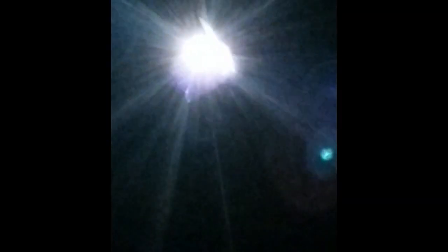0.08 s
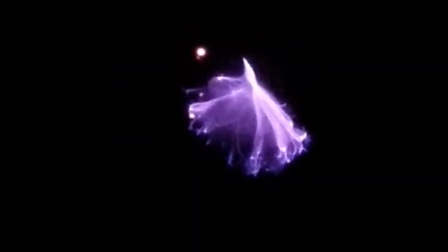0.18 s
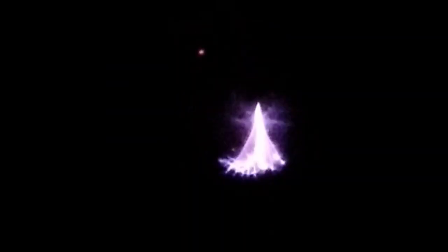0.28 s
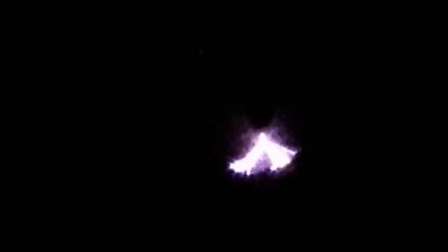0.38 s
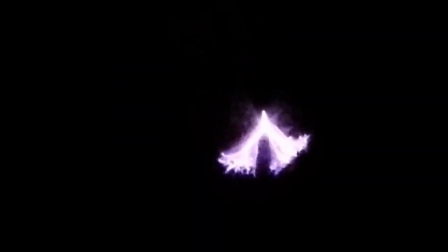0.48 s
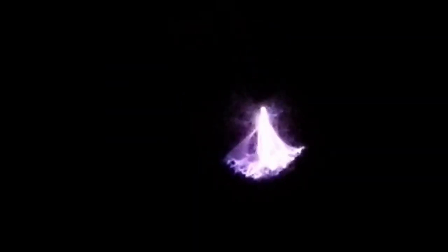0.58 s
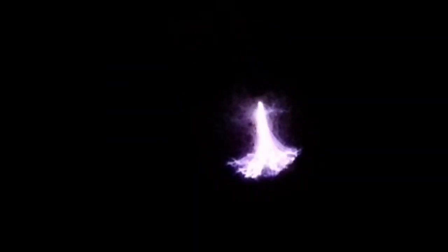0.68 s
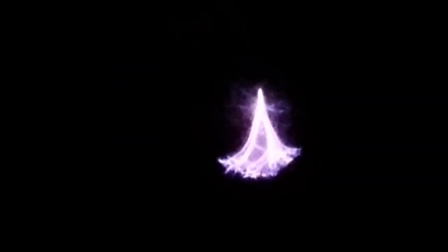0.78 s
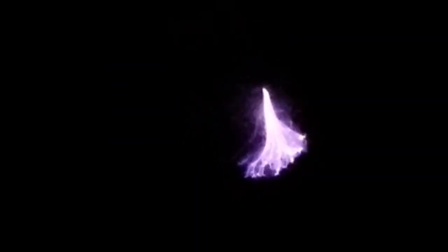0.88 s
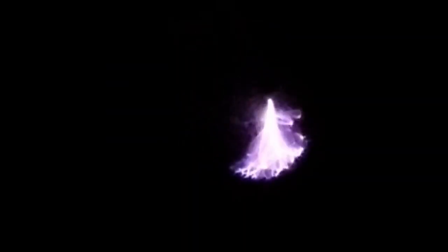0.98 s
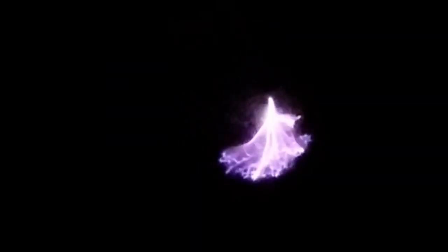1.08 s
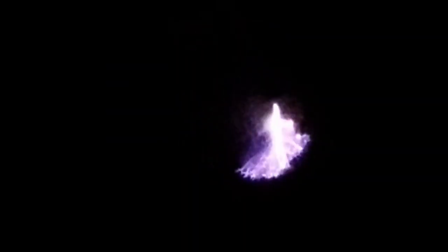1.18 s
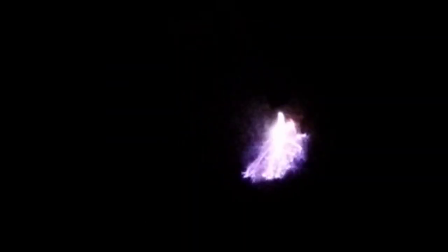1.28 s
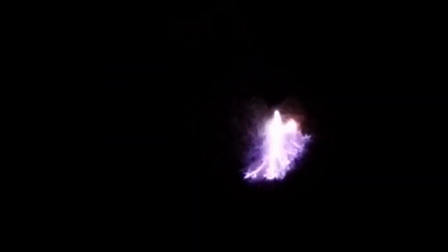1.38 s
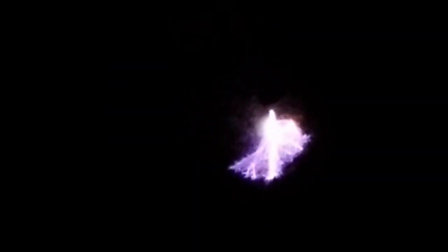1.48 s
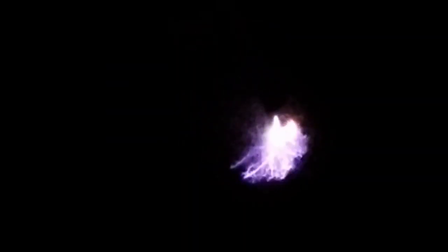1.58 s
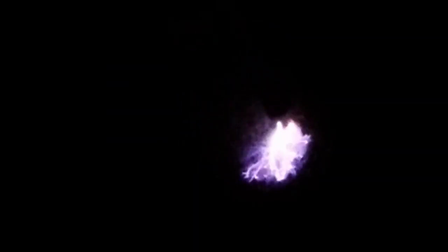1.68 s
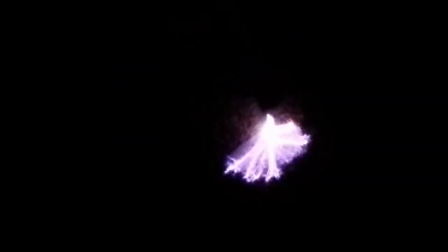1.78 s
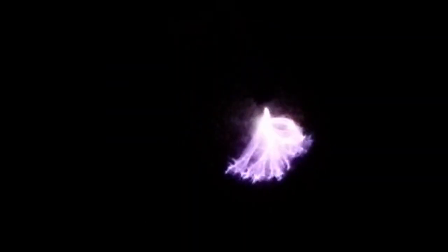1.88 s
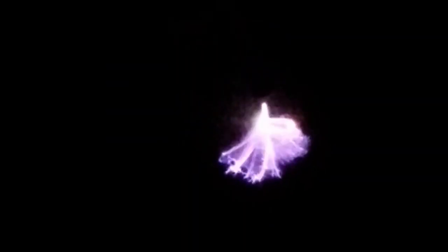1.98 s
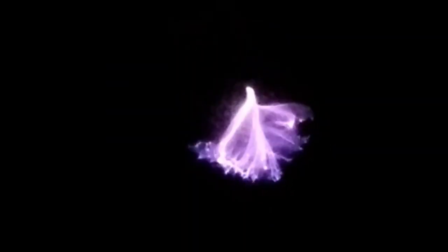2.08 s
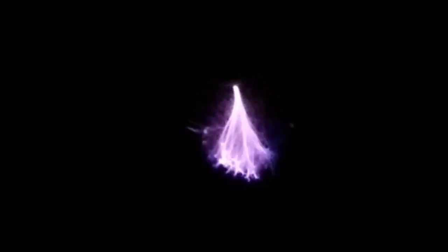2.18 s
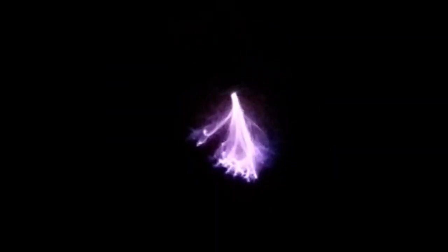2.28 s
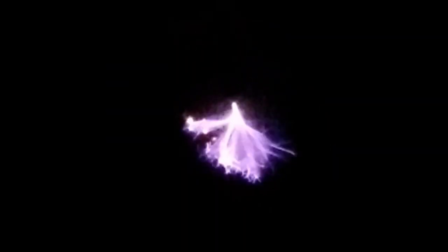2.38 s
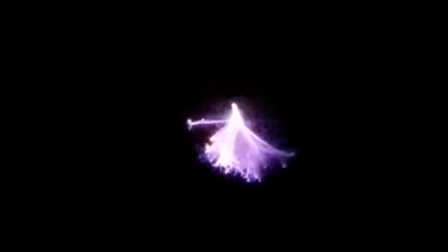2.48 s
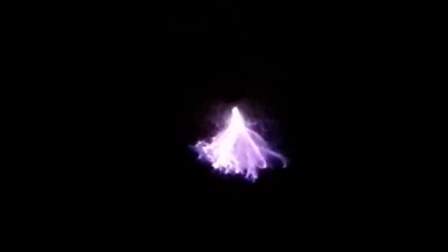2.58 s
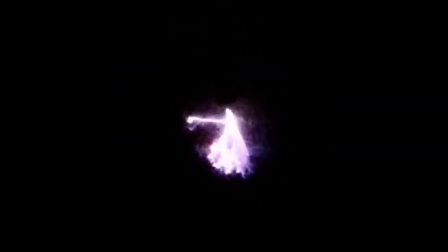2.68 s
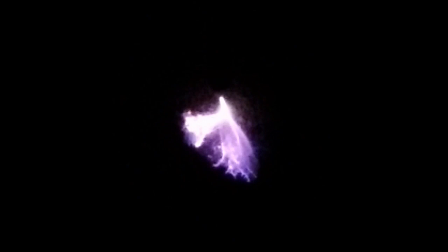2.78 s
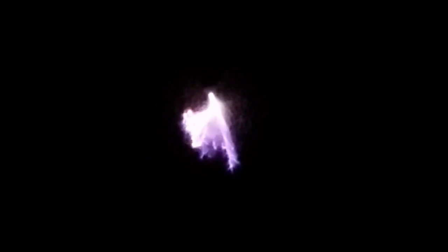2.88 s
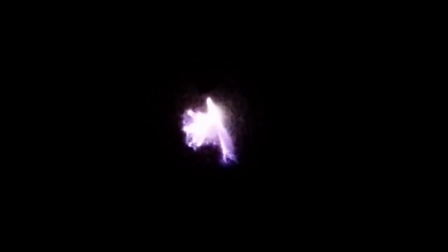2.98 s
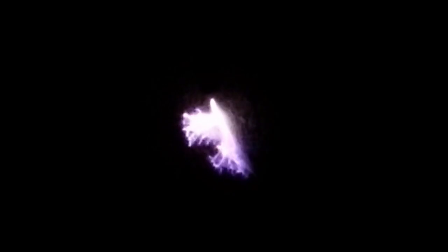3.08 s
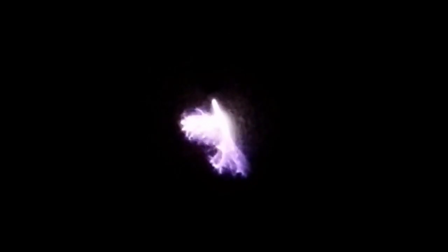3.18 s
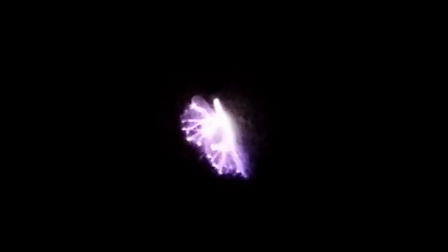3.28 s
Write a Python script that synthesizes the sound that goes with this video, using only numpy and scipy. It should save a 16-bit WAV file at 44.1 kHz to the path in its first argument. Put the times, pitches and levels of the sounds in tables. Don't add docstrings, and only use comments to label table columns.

```python
import sys
import numpy as np
from scipy import signal
from scipy.fft import rfft, irfft
from scipy.io import wavfile
from scipy.ndimage import uniform_filter1d, map_coordinates

SR = 44100
rng = np.random.default_rng(int(sys.argv[2]) if len(sys.argv) > 2 else 0)


def gain_from_db(level_db):
    decades = np.asarray(level_db, float) / 20
    return 10 ** decades


def inscribe(sig):
    pcm = np.round(np.clip(np.atleast_2d(sig).T, -1, 1) * 32767)
    wavfile.write(sys.argv[1], SR, pcm.astype(np.int16))


N = 145530
HALF_CYCLE_HZ = 120

# (start [s], end [s], extra level [dB], long gap bridged [0 or 1])
BRIDGES = [
    (.18, .188, 6, 0),
    (.222, .262, 8, 0),
    (.305, .436, 11, 0),
    (.972, 1.1, 2, 1),
    (1.1, 1.125, 2, 0),
    (2.297, 2.505, 3, 1),
    (2.62, 2.675, 2, 0),
    (2.955, 2.97, 4, 0),
]
# (time [s], level [dB], brightness [0-1], crack rate [1/s])
STREAMERS = [(0, -41, 0.06, 3000), (.09, -47.5, 0.32, 4940), (.1, -56, 0, 4700), (.215, -48.5, 0.06, 3900),
             (.265, -43.5, 0.2, 4800), (.28, -30, 0.5, 3800), (.3, -39.5, 0.64, 4560),
             (.45, -41.5, 0.54, 4520), (.55, -44, 1, 5200), (.655, -41.5, 0.83, 7100),
             (.668, -32, 0.3, 5000), (.8, -29.5, 0.15, 4560), (.95, -28, 0.46, 5250),
             (1.09, -29, 0.32, 4680), (1.14, -32, 0.04, 5000), (1.16, -35, 0.26, 3950),
             (1.34, -31, 0.04, 5240), (1.37, -39, .3, 5050), (1.48, -41.5, 0.2, 5400), (1.51, -46, 1, 4700),
             (2.21, -40.5, 0.94, 3440), (2.24, -26, 0.03, 4400), (2.285, -28.5, 0.07, 4400),
             (2.33, -30.5, 0.56, 5230), (2.52, -32, 0.38, 4800), (2.66, -35, 0.28, 5530),
             (2.74, -35, 0.44, 5700), (2.78, -44, 0.9, 6500), (3.0, -45, 0.87, 3800),
             (3.04, -56.5, 0.7, 3800)]
# (time [s], sizzle level [dB], plasma breath level [dB])
POWDER = [(0.0, -45, -62), (0.16, -59, -58), (0.31, -34, -36), (0.32, -40, -42.5), (0.56, -42, -60.5),
          (0.9, -42.5, -45), (0.98, -42.5, -64), (1.21, -38, -46), (1.83, -39.5, -47.5), (2.08, -35, -54),
          (2.21, -34.5, -35.5), (2.34, -41.5, -61), (2.76, -36.5, -49.5), (2.8, -45, -62),
          (3.0, -40.5, -48.5), (3.09, -47.5, -60), (3.18, -43, -46), (3.3, -41.5, -62.5)]


def unit(x):
    return x / np.sqrt(np.mean(x ** 2) + 1e-20)


def along(points, hz):
    f, v = np.transpose(points)
    return np.interp(np.log(hz + 1), np.log(f + 1), v)


def curves(rows, t):
    s, *cols = np.transpose(rows)
    return [np.interp(t, s, c) for c in cols]


def wobble(rate, t):
    return map_coordinates(rng.standard_normal(int(N * rate / SR) + 9), [t * rate])


def coloured(x, gain_db):
    m = 8192
    cep = irfft(np.log(gain_from_db(gain_db(np.fft.rfftfreq(m, 1 / SR)))), m)
    cep[1:m // 2] *= 2
    cep[m // 2 + 1:] = 0
    response = irfft(np.exp(rfft(cep)), m)[:m // 2]
    return signal.fftconvolve(x, response)[:N]


def toned(x, tone):
    return coloured(x, lambda hz: along(tone, hz))


def pulses(s, size):
    at = np.ravel(s)[:, None] * SR
    k = np.floor(at) + np.arange(-7, 9)
    shape = np.sinc(k - at) * np.cos(np.pi * (k - at) / 16) ** 2 * np.ravel(size)[:, None]
    keep = (k >= 0) & (k < N)
    return np.bincount(k[keep].astype(int), shape[keep], N)


def breakdown():
    # (time [s], delay [ms])
    firing_delay = [(0, 3.6), (.27, 3.7), (.43, 3.6), (.45, 3.1), (.65, 3.0), (.68, 2.75), (.96, 2.85),
                    (1.12, 3.3), (1.16, 2.8), (1.4, 2.9), (1.5, 3.1), (2.2, 3.05), (2.24, 2.8), (2.5, 3.4),
                    (2.56, 2.9), (2.8, 3.05), (3.3, 3.1)]
    # (time [s], extra level [dB])
    odd_shots = [(.387, 4), (.363, 3), (.629, 4), (.637, -4), (.645, 4), (.654, 4), (.662, -5), (.679, 3),
                 (.72, 8), (.737, 5), (.745, -4), (.787, 3), (.803, -5), (.887, 3), (.92, 3), (1.137, 8),
                 (1.22, 3), (1.42, 3), (1.454, 8), (1.47, 6), (2.22, 4), (2.512, -5), (2.52, 6),
                 (2.537, -6), (2.579, 3), (2.604, 5), (2.629, 4), (2.704, 4), (2.929, 6)]
    bridge_delay_ms, jitter_ms = 4.15, .01
    cycle = np.arange(int(N / SR * HALF_CYCLE_HZ)) / HALF_CYCLE_HZ
    delay_ms = curves(firing_delay, cycle)[0]
    extra_db = 0 * cycle
    s, db = np.transpose(odd_shots)
    extra_db[(s * HALF_CYCLE_HZ).astype(int)] = db
    long_gap = np.zeros(len(cycle), bool)
    for start, end, db, bridged in BRIDGES:
        inside = (cycle > start) & (cycle < end)
        long_gap |= inside & (bridged > .5)
        extra_db = extra_db + db * inside
    delay_ms = np.where(long_gap, bridge_delay_ms, delay_ms)
    at = cycle + (delay_ms + jitter_ms * rng.standard_normal(len(cycle))) / 1000
    return cycle, at, extra_db, long_gap


def strike(cycle, at, extra_db, long_gap):
    # (time [s], level [dB])
    strike_level = [(0, -39.5), (.1, -48), (.26, -40.5), (.3, -47), (.44, -43), (.48, -36), (.64, -34),
                    (.67, -39.5), (.97, -39.5), (1.11, -37.5), (1.4, -36), (1.8, -32.5), (2.2, -33),
                    (2.3, -42), (2.52, -38.5), (3.0, -38), (3.04, -39), (3.3, -41)]
    # (frequency [Hz], level [dB])
    strike_tone = [(150, -16), (370, -24), (500, -4.5), (1000, -7.5), (3300, -11.5), (4700, -2.5),
                   (6200, -13), (16000, -21)]
    scatter_db, follows = 1.2, .5
    leader_ms, leader_db = 0.81, -36
    luck = rng.standard_normal((3, len(cycle)))
    size = -gain_from_db(scatter_db * luck[0] + follows * extra_db * ~long_gap)
    led = (cycle > 0.93) & (cycle < 3.3)
    leader_at = at - leader_ms * (1 + 0.21 * luck[1]) / 1000
    leader = pulses(leader_at, led * gain_from_db(leader_db + 1.33 * luck[2]))
    clicks = unit(toned(pulses(at, size) + leader, strike_tone))
    return clicks * gain_from_db(curves(strike_level, np.arange(N) / SR)[0])


def streamers(cycle, at, extra_db):
    # (frequency [Hz], level [dB])
    dull_tone = [(100, -84), (600, -56), (2000, -12.5), (3400, 1.5), (4300, -1.5), (6000, -8.5),
                 (9000, -16), (16000, -27.5)]
    bright_tone = [(100, -80), (600, -49), (2000, -10.5), (3200, -9), (6000, 0.5), (8000, -2.5),
                   (12000, -5), (16000, -7)]
    volley_ms, volley_scatter_db, flicker_db = 0.71, 1.3, 1
    crack_spread_db, crack_jitter, rate_scatter = 1.8, .08, .06
    luck = rng.standard_normal((2, len(cycle)))
    draw = rng.standard_normal((len(cycle), 2, 12))
    gap = 1 / (curves(STREAMERS, cycle)[2] * (1 + rate_scatter * luck[0]))
    after = gap[:, None] * (np.arange(12) + crack_jitter * draw[:, 0])
    u = np.abs(after) * 1000 / volley_ms
    envelope = (0.25 + u) * np.exp(-u ** 2)
    volley_db = volley_scatter_db * luck[1] + flicker_db * wobble(24.3, cycle)
    size = envelope * gain_from_db(crack_spread_db * draw[:, 1] + volley_db[:, None])
    when = at[:, None] + after
    plain = pulses(when, size)
    cracks = pulses(when, size * gain_from_db(extra_db)[:, None])

    def shade(tone):
        return toned(cracks, tone) / np.std(toned(plain, tone))

    level_db, bright, _ = curves(STREAMERS, np.arange(N) / SR)
    bright = np.clip(bright, 0, 1)
    mixed = np.sqrt(bright) * shade(bright_tone) + np.sqrt(1 - bright) * shade(dull_tone)
    return 1.44 * gain_from_db(level_db) * mixed


def powder():
    # (frequency [Hz], level [dB])
    pop_tone = [(100, -27), (350, -13.5), (1000, 0.5), (1800, -4.5), (2500, -7), (5000, -4.5),
                (10000, -39.5), (16000, -39)]
    # (time [s], peak level [dB])
    bursts = [
        (.2697, -20),
        (0.275, -5),
        (.2897, -8),
        (0.3005, -7),
        (.3075, -7),
    ]
    rate, spread_db, burst_gain_db, sizzle_gain_db = 900, 3.5, 12, -1.5
    when = rng.random(int(rate * N / SR)) * N / SR
    sizes = gain_from_db(spread_db * rng.standard_normal(len(when)))
    sizzle = unit(toned(pulses(when, sizes), pop_tone))
    sizzle_db = curves(POWDER, np.arange(N) / SR)[0] + sizzle_gain_db
    s, db = np.transpose(bursts)
    return gain_from_db(sizzle_db) * sizzle + toned(pulses(s, gain_from_db(db + burst_gain_db)), pop_tone)


def plasma():
    # (time [s], level [dB])
    swells = [(0.349, -44), (0.392, -58), (0.439, -48), (0.647, -45), (0.805, -55), (0.873, -48),
              (1.116, -44), (1.237, -35), (1.308, -37), (1.359, -41), (1.459, -46), (1.584, -35),
              (1.622, -43), (1.736, -39), (1.846, -37.5), (1.93, -51), (1.967, -48), (2.042, -54),
              (2.209, -49), (2.581, -42), (2.643, -45.5), (2.707, -53), (2.762, -45), (2.901, -48),
              (2.938, -42), (2.988, -41), (3.182, -56), (3.25, -39)]
    # (frequency [Hz], level [dB])
    puff_tone = [(20, -23), (60, -5), (120, -7.5), (250, -10), (500, -8), (1000, -92)]
    hum_db, swell_db, steady_hum_db, octave_db = -11, -9, -66, -12
    puff_db, swell_puff_db, gasp_db = -6, -14, 13
    puff_rate, swell_s = 90, .014
    t = np.arange(N) / SR
    breath = gain_from_db(curves(POWDER, t)[1])
    swell = sum(gain_from_db(level) * np.exp(-((t - at) / swell_s) ** 2) for at, level in swells)

    turn = 2 * np.pi * HALF_CYCLE_HZ * t + 0.55
    sway = turn + .6 * wobble(30, t)
    hum = np.cos(sway) + gain_from_db(octave_db) * np.cos(2 * sway)
    hum = np.sqrt(2) * gain_from_db(2.5 * wobble(24, t)) * hum
    steady = gain_from_db(steady_hum_db) * np.cos(turn)

    when, strength, side = rng.random((3, int(puff_rate * N / SR)))
    puff_sizes = gain_from_db(6.2 * strength ** 2) * np.sign(side - .7)
    puffs = unit(toned(pulses(when * N / SR, puff_sizes), puff_tone))
    s, db = np.transpose(swells)
    gasps = toned(pulses(s, gain_from_db(db + gasp_db)), puff_tone)

    hum_level = gain_from_db(hum_db) * breath + gain_from_db(swell_db) * swell
    puff_level = gain_from_db(puff_db) * breath + gain_from_db(swell_puff_db) * swell
    return hum_level * hum + steady + puff_level * puffs - gasps


def fizz():
    # (frequency [Hz], level [dB])
    fizz_tone = [(1500, -26.5), (3000, 2), (5000, 0), (7000, -5), (10000, -1), (16000, -4)]
    fizz_db, rate, follows, spread_db = -40.5, 6000, 0.85, 8
    t = np.arange(N) / SR
    level_db, bright, _ = curves(STREAMERS, t)
    for start, end, db, _ in BRIDGES:
        inside = 1. * ((t > start) & (t < end))
        level_db = level_db + db * uniform_filter1d(inside, size=300)
    grains = []
    for when, strength in rng.random((2, 2, int(rate * N / SR))):
        grains.append(unit(toned(pulses(when * N / SR, gain_from_db(spread_db * strength)), fizz_tone)))
    level = gain_from_db(fizz_db + follows * (level_db + 46.5))
    return level * np.sqrt(np.clip(bright, .05, 1)) * np.array(grains)


def floor():
    # (frequency [Hz], level [dB])
    floor_tone = [(30, -10), (200, -8), (1000, -31.5), (5000, -3), (9000, -22), (16000, -35)]
    noise = np.array([toned(v, floor_tone) for v in rng.standard_normal((2, N))])
    return gain_from_db(-56) * unit(noise)


def workshop(x, wall_db):
    # (left delay [ms], left gain [ratio], right delay [ms], right gain [ratio])
    echoes = [(.62, -.1, .5, .45), (1.45, .3, 1.3, -.2), (2.25, .22, 2.7, .35), (3.55, .15, 3.2, .15),
              (4.45, -.15, 4.7, .15)]
    # (frequency [Hz], decay time by 60 dB [s])
    walls = [(200, 0.083), (2000, 0.51), (6000, 0.23), (14000, 0.009)]
    right_lag_ms = .082
    soak_hz, soak_width_hz, soak_db = 4800, 2000, -8
    wall_low_hz = 1200
    hz, t, z = signal.stft(rng.standard_normal((2, SR // 3)), SR, nperseg=256)
    decay = gain_from_db(-60 * t / along(walls, hz)[:, None])
    tail = signal.istft(z * decay, SR, nperseg=256)[1]
    tail = gain_from_db(wall_db) * tail / np.linalg.norm(tail[0])
    tail = np.pad(tail, ((0, 0), (60, 0)))

    left_ms, left, right_ms, right = np.transpose(echoes)
    lead = 8 / SR
    right_lead = lead + right_lag_ms / 1000
    direct = np.array([pulses(lead, 1), pulses(right_lead, 1)])[:, :32]
    near = np.array([pulses(lead + left_ms / 1000, left), pulses(right_lead + right_ms / 1000, right)])

    def off_axis_db(f):
        soak = soak_db / (1 + (2 * (f - soak_hz) / soak_width_hz) ** 2)
        return soak - 10 * np.log10(1 + (wall_low_hz / (f + 20)) ** 4)

    def heard(v, answer):
        return signal.fftconvolve(v[None], answer, axes=1)[:, 8:N + 8]

    return heard(x, direct) + heard(coloured(x, off_axis_db), tail + near[:, :tail.shape[1]])


def scene():
    cycle, at, extra_db, long_gap = breakdown()
    sound = workshop(strike(cycle, at, extra_db, long_gap), -7.5)
    sound = sound + workshop(streamers(cycle, at, extra_db), -14)
    sound = sound + workshop(powder(), -8)
    return sound + plasma() + fizz() + floor()


def low_pass(x):
    return signal.sosfilt(signal.butter(12, 15900, fs=SR, output="sos"), x)


def record(dry):
    # (frequency [Hz], width [Hz], level [dB])
    peaks_and_dips = [(4847, 1110, 9.5), (2423, 360, 10.5), (6960, 1840, 12), (9184, 213, 12), (11100, 347, 6),
                      (3030, 140, -8), (2080, 300, -9), (1020, 320, 4), (1300, 200, 3)]
    # (frequency [Hz], left over right [dB])
    lean = [(550, -1), (850, -6), (1450, 5), (2700, -1), (3300, 5.5), (5000, 5.5), (6500, 0), (15000, 3)]
    even_below_hz, top, knee, top_hz = 350, .9, 4, 16100

    def port_db(hz, side):
        body = sum(db / (1 + (2 * (hz - c) / w) ** 2) for c, w, db in peaks_and_dips) - 3
        return body + side * along(lean, hz) / 2 / (1 + (even_below_hz / (hz + 1)) ** 4)

    left = coloured(dry[0], lambda hz: port_db(hz, 1))
    right = coloured(dry[1], lambda hz: port_db(hz, -1))
    ports = np.array([left, right])
    ports = ports / (1 + np.abs(ports / top) ** knee) ** (1 / knee)
    ports = irfft(rfft(ports) * (np.fft.rfftfreq(N, 1 / SR) < top_hz), N)
    return low_pass(ports)


dry = scene()
out = record(dry)
inscribe(out)
```